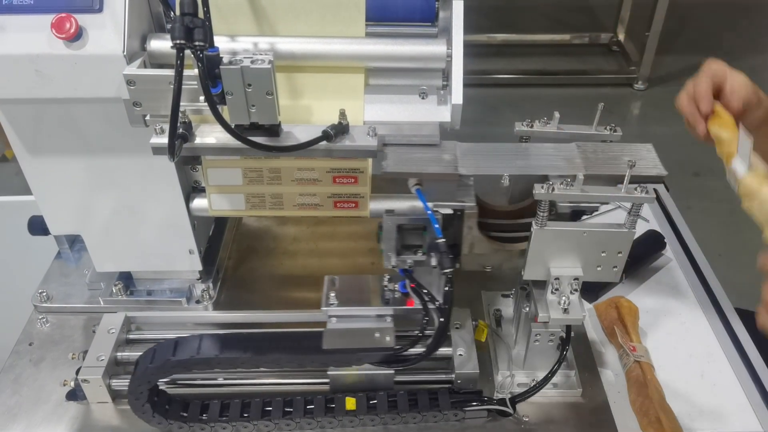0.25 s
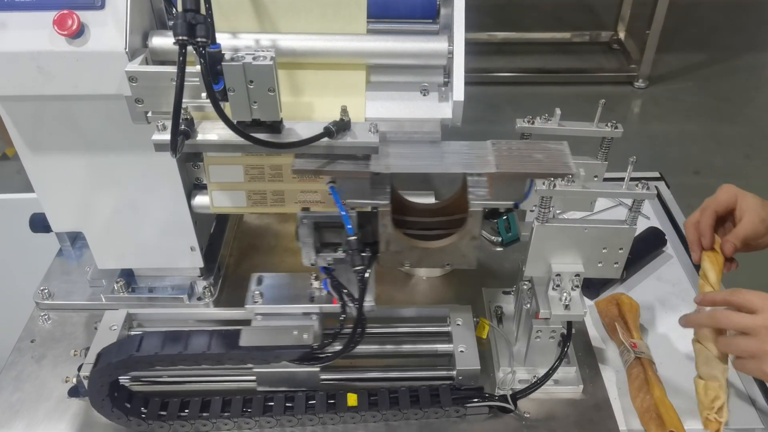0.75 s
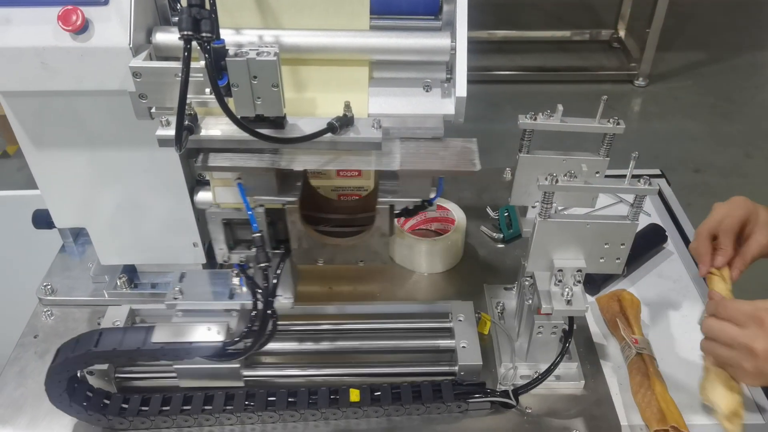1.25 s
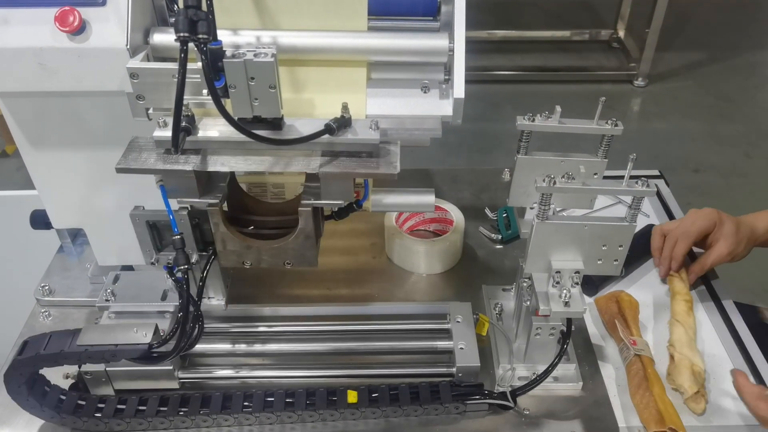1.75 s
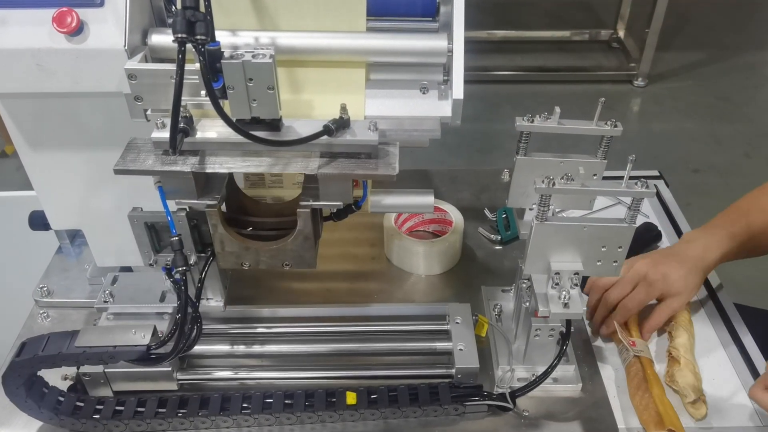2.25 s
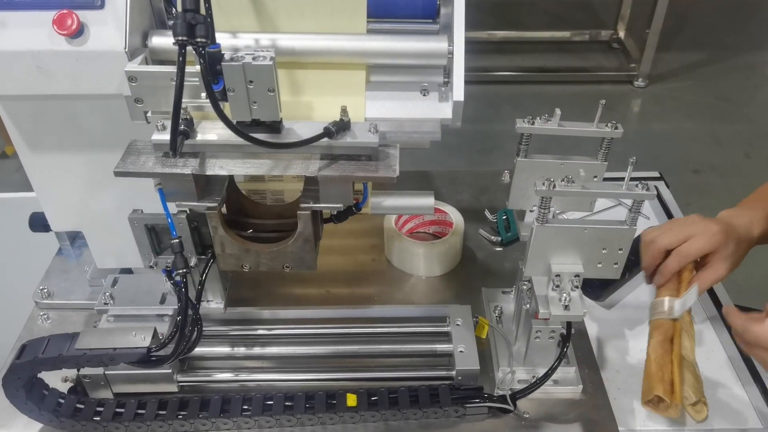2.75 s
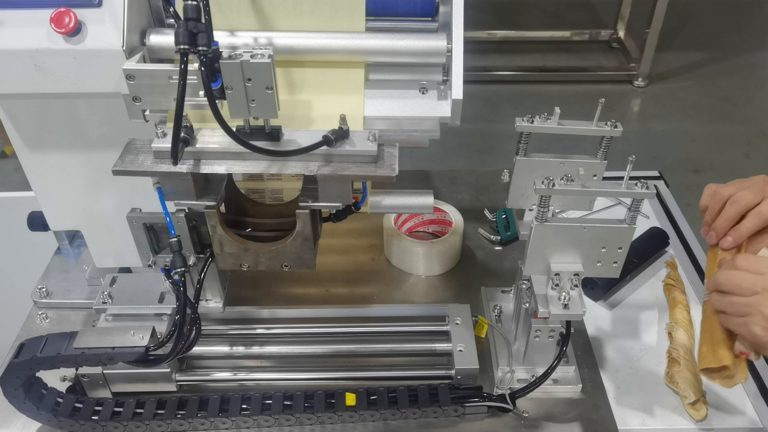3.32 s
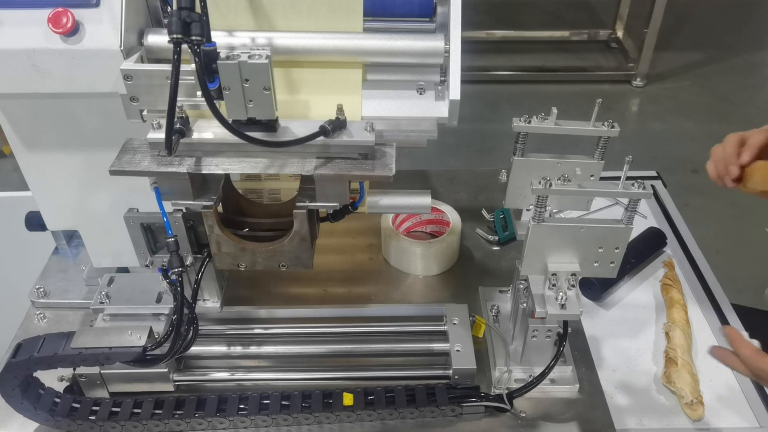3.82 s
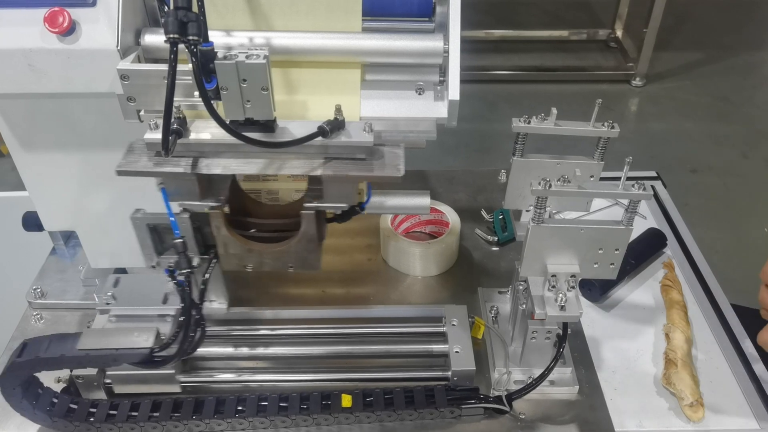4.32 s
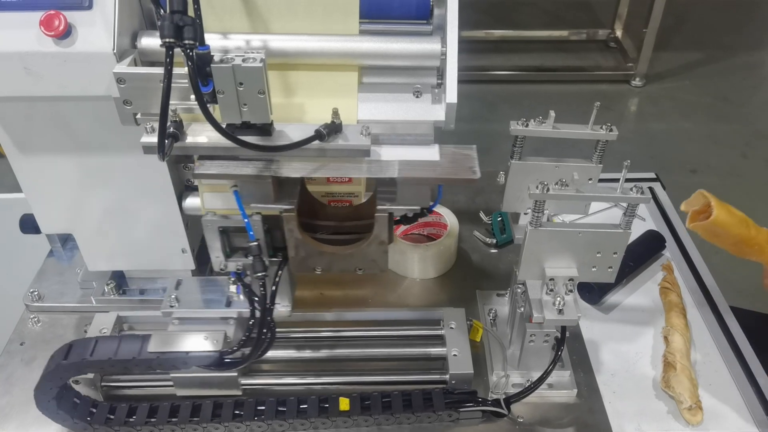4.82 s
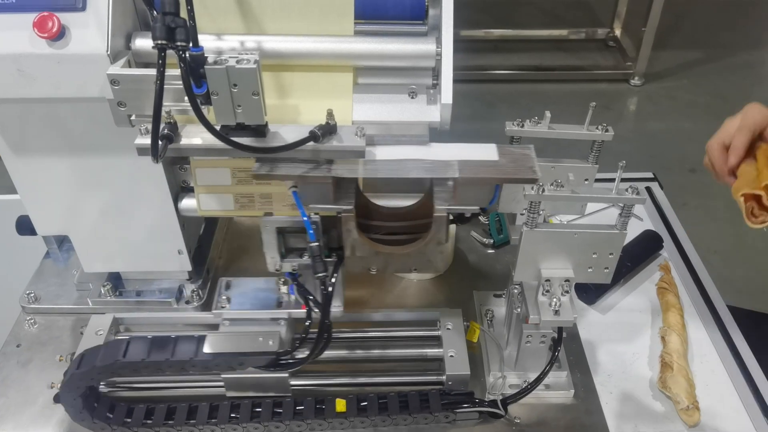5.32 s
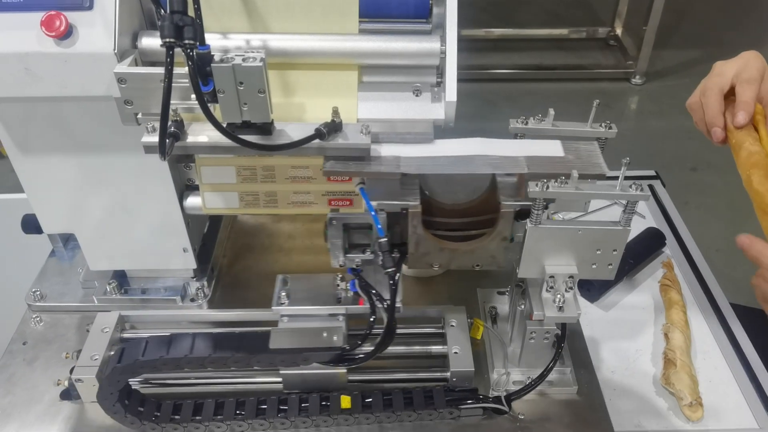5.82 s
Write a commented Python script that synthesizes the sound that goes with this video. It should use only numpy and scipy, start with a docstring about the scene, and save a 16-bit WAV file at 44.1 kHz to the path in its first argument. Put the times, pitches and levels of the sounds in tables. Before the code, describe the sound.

Close stereo pickup of a pneumatic machine in a reverberant workshop: low steady hum, wavering motor whine, fine cable-chain ticking. Small valve clicks come in clusters, then hiss and dull frame knocks. A sharp clack opens a fierce, fluttering air blast, which shuts with a knock and fading puff. The level drops suddenly, then slowly recovers beneath hiss, whine and isolated ticks.

```python
"""A machine worked by compressed air sticks labels in a hard-walled workshop, over a low hum and whine.
At first a slide squeals briefly as the carriage sets off; tones and noise bands make the drives' sound.
Valves tick in short spits of tiny impacts, air starts to leak as hiss, and knocks ring the metal frame.
Then a jet of shaped noise blasts for half a second, its cylinder vents, and the hall echoes it.
The blast turns the overall level down; it creeps back while the carriage travels once more."""
import sys
import numpy as np
from scipy import signal
from scipy.fft import rfft, irfft, next_fast_len
from scipy.io import wavfile
from scipy.ndimage import uniform_filter1d

SR = 44100
rng = np.random.default_rng(int(sys.argv[2]) if len(sys.argv) > 2 else 0)


def pcm_store(signal):
    """Save signal as 16-bit PCM."""
    levels = np.round(np.clip(np.atleast_2d(signal), -1, 1) * 32767)
    wavfile.write(sys.argv[1], SR, levels.astype(np.int16).T)


N = 267687
TIME = np.arange(N) / SR


def from_db(db):
    """Turn decibels into a gain."""
    return 10 ** (np.asarray(db) / 20)


def rms_one(x):
    """Scale a sound to an average power of 1."""
    return x / np.sqrt(np.mean(x ** 2) + 1e-20)


def at_hz(points, hz):
    """Read a table between its points, with pitch on a log axis."""
    table = np.array(points)
    return np.interp(np.log(np.maximum(hz, 1)), np.log(table[:, 0]), table[:, 1])


def coloured(x, colour):
    """Make each pitch of a sound louder or softer, following a table in dB."""
    size = next_fast_len(N + SR // 20, real=True)
    hz = np.fft.rfftfreq(size, 1 / SR)
    return irfft(rfft(x, size) * from_db(at_hz(colour, hz)), size)[..., :N]


def noise(colour):
    """Fresh noise with the given balance of pitches and an average power of 1."""
    return rms_one(coloured(rng.standard_normal(N), colour))


def noise_pair(colour):
    """Two separate noises, one for each microphone."""
    return np.array([noise(colour), noise(colour)])


def drift(rate_hz):
    """A slow random wander around 0, with an average power of 1."""
    step = 40   # compute every 40th sample, then join the points
    r = np.exp(-2 * np.pi * rate_hz * step / SR)
    slow = signal.lfilter([1], [1, -2 * r, r * r], rng.standard_normal(N // step + 2002))
    slow = slow[2000:]   # leave out the filter's start-up
    return np.interp(np.arange(N) / step, np.arange(len(slow)), rms_one(slow))


def burst(start_s, level_db, decay_s):
    """An envelope that jumps up and dies away."""
    out = np.zeros(N)
    first = max(int(start_s * SR), 0)
    age = TIME[:min(int(20 * decay_s * SR) + 1, N - first)]
    out[first:first + len(age)] = from_db(level_db) * np.exp(-age / decay_s)
    return out


def gate(start_s, end_s, rise_s, fall_s):
    """An envelope that builds up towards 1, holds, and dies away after its end."""
    rise = 1 - np.exp(-np.maximum(TIME - start_s, 0) / rise_s)
    return rise * np.exp(-np.maximum(TIME - end_s, 0) / fall_s)


def opening(start_s, rise_s, surge_db, settle_s):
    """Flow through an opened port: stored pressure makes it surge, then it settles to 1."""
    age = np.maximum(TIME - start_s, 0)
    return (1 - np.exp(-age / rise_s)) * from_db(surge_db * np.exp(-age / settle_s))


def resonance(x, hz, width):
    """Ring at one pitch: a narrow width in Hz rings longer, and the gain at the peak is 1."""
    r = np.exp(-np.pi * width / SR)
    feed = np.array([1, 0, -1]) * (1 - r * r) / 2
    return signal.lfilter(feed, [1, -2 * r * np.cos(2 * np.pi * hz / SR), r * r], x)


def high_pass(x, cut_hz):
    """Take away the sound below a pitch."""
    return signal.sosfilt(signal.butter(2, cut_hz, "high", fs=SR, output="sos"), x)


def pan(left_db):
    """Gains of the two microphones: the left one is this many dB above the right."""
    return from_db(np.array([[1], [-1]]) * left_db / 2)


def arrive(x, lead_ms):
    """Sound reaches the left microphone earlier than the right."""
    left, right = np.broadcast_to(x, (2, N))
    return np.array([left, np.roll(right, int(round(lead_ms * SR / 1000)))])


# how long the hall's echoes take to fall by 60 dB: pitch_hz, time_s
HALL_FADE = [(100, 1.34), (400, 1.22), (1500, 1.36), (5000, 1.26), (8500, 1.34), (11000, 0.39),
             (15000, 0.22)]


def hall_response(near_db=15.5, near_decay_s=0.0044, alike_hz=520):
    """Dense echoes: strong early ones off the machine's plates, then the hall's tail."""
    t = TIME[:3 * SR // 2]
    edges = np.geomspace(40, 18000, 15)
    out = 0
    for low, high in zip(edges, edges[1:]):
        hz = np.sqrt(low * high)
        band = signal.butter(2, [low, high], "band", fs=SR, output="sos")
        mid, side = signal.sosfilt(band, rng.standard_normal((2, len(t))))
        alike = 1 / (1 + (hz / alike_hz) ** 2)   # both microphones share the bass
        fade = np.exp(-np.log(1000) * t / at_hz(HALL_FADE, hz))
        out = out + fade * (np.sqrt(1 + alike) * mid + np.sqrt(1 - alike) * side * [[1], [-1]])
    early = 1 + from_db(near_db) * np.exp(-t / near_decay_s)
    out = out * early * (t > .002)   # no echo in the first 2 ms
    return out / np.sqrt(np.sum(out ** 2) / 2)


def in_hall(x, hall, wet_db):
    """Direct sound plus its echoes."""
    size = next_fast_len(N + hall.shape[1], real=True)
    echoes = irfft(rfft(x, size) * rfft(hall, size), size)[:, :N]
    return x + from_db(wet_db) * echoes


def stream(flow, colour, hall, lead_ms, wet_db):
    """An air stream is a long source: its two halves hiss separately and take different echo paths."""
    out = 0
    for paths in (hall, hall[::-1] * [[1], [-1]]):
        out = out + in_hall(arrive(flow * noise(colour), lead_ms), paths, wet_db)
    return out / np.sqrt(2)


# the carriage travels out and back: start_s, stop_s
TRAVELS = [(-.05, 2), (4.45, 6.2)]


def speed(speed_up_s=0.42, slow_down_s=0.22):
    """Speed of the carriage: it builds up towards full speed, 1, and dies away after each stop."""
    return sum(gate(start, stop, speed_up_s, slow_down_s) for start, stop in TRAVELS)


# balance of pitches in the hum: pitch_hz, relative level_db
HUM_COLOUR = [(25, -42), (50, -28), (80, -6), (120, 6.5), (175, -5), (260, -10.5), (340, -11), (450, -10.5),
              (560, -17), (1000, -17.5), (3000, -56)]


def motor_hum():
    """Low noise, mostly alike at both microphones, with a fainter part of opposite sign."""
    return from_db(-48) * noise(HUM_COLOUR) + from_db(-63.5) * noise(HUM_COLOUR) * [[1], [-1]]


# balance of pitches in the faint air noise: pitch_hz, relative level_db
AIR_COLOUR = [(200, -8), (900, -13), (1300, -4.5), (1700, -5.5), (2200, -1), (3500, -6.5), (4700, -1),
              (5800, -1), (7000, 4.5), (8600, 1.5), (10000, -10), (11500, -55), (16000, -46)]


def air_noise():
    """Steady faint noise of air, separate at each microphone."""
    return from_db(-41.0) * noise_pair(AIR_COLOUR) * pan(left_db=-3.5)


def drone(idle_db=-52, load_db=-52):
    """Noise rings near 250 Hz; the drive train drones harder under load."""
    load = gate(start_s=0.76, end_s=2.44, rise_s=0.27, fall_s=0.5)
    effort = from_db(idle_db) + from_db(load_db) * load
    ringing = resonance(rng.standard_normal(N), hz=243.7, width=27.5)
    return effort * rms_one(resonance(ringing, hz=256, width=270))


def tones(table, waver_hz=10.5):
    """Steady tones that waver in level and phase, above 500 Hz differently at each microphone."""
    out = np.zeros((2, N))
    for hz, level_db, waver in table:
        turning = np.exp(2j * np.pi * (hz * TIME + rng.random()))
        wander = np.array([1 + waver * (drift(waver_hz) + 1j * drift(waver_hz)) / np.sqrt(2)
                           for ear in range(2)])
        if hz < 500:
            heard = wander[0]   # long waves reach both microphones alike
        else:
            heard = wander * pan(left_db=-8.0) * np.array([[1], [1j]])   # a quarter turn apart
        out += from_db(level_db) * np.sqrt(2) * (heard * turning).real
    return out


# steady tones of the drives: pitch_hz, level_db, waver_share (0-1)
WHINE = [(1372.3, -47, 0.21), (1464, -49.5, 0.12), (1273, -58.5, 0.6), (1218, -63, 1), (117.7, -61, 0.51)]


def drive_whine():
    """The turning drives give steady, slightly wavering tones."""
    return tones(WHINE)


# tones of the carriage: pitch_hz, relative level_db, waver_share (0-1)
TRAVEL_TONES = [(1942, -53, 0.32), (2204, -55, 0.22), (2439, -63.5, 0.94), (2840, -59.5, 0.3),
                (4320, -61, 0.32), (7100, -53, .7)]


def carriage_singing(idle_db=-3.5, travel_db=-8):
    """The carriage's tones sound at rest and grow louder with its speed."""
    return (from_db(idle_db) + from_db(travel_db) * speed()) * tones(TRAVEL_TONES)


def slide_squeal(pitch_hz=4945, level_db=-33.5, decay_s=0.092):
    """A slide squeals out as the carriage sets off: ringing noise plus the dying hiss of an earlier sound."""
    ringing = resonance(rng.standard_normal((2, N)), pitch_hz, width=120)
    squeal = rms_one(resonance(ringing, pitch_hz, width=510))
    fading_hiss = from_db(-2.5) * noise_pair(TICK_COLOUR) * pan(left_db=-3.0)
    return burst(0, level_db, decay_s) * (squeal + fading_hiss)


# ports that open and go on leaking: start_s, relative level_db
LEAKS = [(1.402, -30.5), (1.575, -30)]
# balance of pitches in the leak's hiss: pitch_hz, relative level_db
LEAK_COLOUR = [(300, -52), (2100, -15.5), (3900, -17.5), (5500, -13.5), (7000, -2.5), (8400, 5),
               (9200, -0.5), (10000, -6.5), (11500, -20), (13200, -22.5), (16000, -32)]


def leak_hiss(hall):
    """Air seeps through small openings: each surges as it opens, then goes on hissing unevenly."""
    flow_power = 0
    for start, level_db in LEAKS:
        flow = from_db(level_db) * opening(start, rise_s=0.0045, surge_db=2, settle_s=0.7)
        flow_power = flow_power + flow ** 2
    flicker = from_db(drift(6.4) * 0.51)
    hiss = stream(np.sqrt(flow_power) * flicker, LEAK_COLOUR, hall, lead_ms=.02, wet_db=9.0)
    return from_db(-11.5) * hiss * pan(left_db=-3.0)


# balance of pitches in the rush: pitch_hz, relative level_db
RUSH_COLOUR = [(150, -24), (450, -0.5), (620, -9.5), (1100, -0.5), (1600, -1), (2100, 3.5), (3000, 4.5),
               (3900, -7.5), (5500, 4), (9000, -25)]


def line_rush(level_db=-40, travel_db=1):
    """A duller rush builds up in the lines behind the first leak, and swells as the carriage moves."""
    port = opening(LEAKS[0][0], rise_s=0.23, surge_db=8.5, settle_s=1.2)
    swell = from_db(level_db + travel_db * speed()) * port
    return swell * noise_pair(RUSH_COLOUR) * pan(left_db=-1.5)


# valve and latch ticks: start_s, relative level_db, decay_s, left_minus_right_db, relative ring_db
TICKS = [(.544, -30, .004, -3, 0), (.601, -27.5, 0.0048, -1, -10), (.876, -21.5, .002, 3, -8),
         (.893, -23, .002, -1, -12), (0.902, -22, 0.0026, -2, -10), (.908, -14, 0.003, 0, -14),
         (1.178, -25, .005, 6, -15), (1.182, -4.5, 0.00082, -5.5, -27), (1.2148, -11.5, 0.0017, 1, -14),
         (1.226, -19, .002, 0, -6), (1.238, -19, .0035, -5, -8), (1.408, -21.5, .0055, -5, -28),
         (1.61, -12, 0.0082, -4, -6.5), (2.091, -19.5, 0.0036, -5, -2), (2.441, -11, 0.002, -1, -2.5),
         (2.526, -12, 0.0022, -1, -13), (2.548, -6.5, 0.0013, -3, -6), (2.808, 11, 0.0021, 1, -0.5),
         (3.777, -14, 0.0067, -1, -1.5), (4.054, -11.5, 0.0024, -2, -1), (4.199, -18, .004, -1, -10),
         (4.211, -15.5, 0.0035, 1, 3.5), (4.976, -13, 0.004, 1, -6), (5.272, -12, .0035, -2, -24),
         (5.739, -18, 0.0053, -2, -4)]
# balance of pitches in a tick: pitch_hz, relative level_db
TICK_COLOUR = [(400, -30), (3500, -23), (4900, -23), (7000, -2), (8600, 0.5), (10000, -6.5), (11500, -24),
               (14000, -32), (16000, -44)]


def ticks(hall, rise_s=0.00018, links_per_s=9.0, ring_hz=5250):
    """Valves, latches, loose fittings and the moving cable chain spit tiny impacts; all but the chain ring."""
    # the faster the carriage, the more often a chain link ticks
    links = (rng.random(N) < links_per_s * speed() / SR) * rng.random(N)
    link_shape = burst(0, level_db=-30.5, decay_s=.004)[:SR // 20]
    chain = signal.oaconvolve(links, link_shape)[:N] * pan(left_db=5.5)
    # loose fittings clatter at each blow on the frame
    clatter = sum(burst(start, clatter_db, decay_s=0.031) for start, *_, clatter_db in BLOWS)
    clatter = clatter * pan(left_db=-2.5)
    spit = chain + clatter
    ring = from_db(-3.5) * clatter
    for start, level_db, decay, left_db, ring_db in TICKS:
        envelope = burst(start, level_db, decay) * pan(left_db)
        spit += envelope
        ring += envelope * from_db(ring_db)
    soft = np.exp(-1 / (rise_s * SR))   # contacts build up over a fraction of a millisecond
    envelopes = signal.lfilter([1 - soft], [1, -soft], np.array([spit, ring]) + 1e-18)
    # random signs turn the envelopes into dense tiny impacts
    spit, ring = envelopes * rng.choice([-1, 1], (2, 2, N))
    ring = resonance(resonance(ring, ring_hz, width=2200), ring_hz, width=5200)
    direct = from_db(8) * coloured(spit, TICK_COLOUR) + from_db(3) * ring
    return in_hall(direct, hall, wet_db=-1.5)


# cylinder and carriage blows on the frame, all levels relative:
# start_s, push_db, rattle_db, rattle_decay_s, contact_cutoff_hz, loose_fittings_clatter_db
BLOWS = [(1.570, 3, -20, 0.04, 2310, -17.5), (1.632, -7, -21, 0.065, 1410, -22),
         (1.676, -10, -29.5, 0.12, 1000, -22.5), (1.825, -13, -27, 0.024, 513, -21),
         (2.772, 6, -11.5, 0.0062, 700, -7.5), (2.819, -2, -15.5, .012, 400, -17.5),
         (3.277, 6, -19, 0.061, 500, -1), (3.402, -3, -8.5, 0.01, 199, -20)]
# pitches at which the frame rings: pitch_hz, width_hz, relative level_db
FRAME = [(127, 32, 2), (248, 24, 0), (322, 17.5, 3), (401.5, 46, 3.5), (430.3, 54, 3.5), (721, 57, -2.5),
         (836, 83, -6.5), (1060, 190, -6), (2400, 1500, -13.5), (4200, 1100, -23)]


def blows(hall, push_s=0.00045, rattle_low_hz=220):
    """A soft push and a dense rattle, dulled by the contact, set the frame ringing."""
    force = 0
    for start, push_db, rattle_db, decay, cut_hz, _ in BLOWS:
        rattle = burst(start, rattle_db, decay) * rng.choice([-1, 1], N)
        rattle = high_pass(rattle, rattle_low_hz)
        push = from_db(-18) * burst(start, push_db, push_s)
        contact = signal.butter(1, cut_hz, fs=SR, output="sos")
        force = force + signal.sosfilt(contact, rattle + push)
    frame = 0
    for k, (hz, width, level_db) in enumerate(FRAME):
        frame = frame + (-1) ** k * from_db(level_db) * resonance(force, hz, width)
    frame = high_pass(frame, 70)   # a small frame radiates no deep bass
    return in_hall(from_db(16) * frame * pan(left_db=-0.5), hall, wet_db=-4.0)


# balance of pitches in the venting air: pitch_hz, relative level_db
VENT_COLOUR = [(100, -34), (700, -37), (2200, -12), (4400, -6.5), (5600, 3.5), (6800, -4.5), (8400, 10),
               (11000, -17.5), (16000, -37)]
JET_OPEN_S, JET_SHUT_S = 2.772, 3.290   # the jet's valve opens and shuts


def cylinder_vent(hall):
    """The cylinder lets out its air in a fading puff of noise as the jet shuts."""
    puff = burst(JET_SHUT_S, level_db=-9.0, decay_s=0.1) * noise(VENT_COLOUR)
    return in_hall(arrive(puff, lead_ms=0.18), hall, wet_db=10.0) * pan(left_db=-3.0)


# balance of pitches in the jet: pitch_hz, relative level_db
JET_COLOUR = [(50, -33), (130, -21), (800, -28), (2200, -20), (4100, -16.5), (4650, -21), (5900, -8),
              (7100, -4), (7800, 4.5), (8900, 1.5), (9800, -2.5), (11600, -16), (13200, -9), (16000, -15.5)]
# the jet's beam reaches the microphones unevenly: pitch_hz, left_minus_right_db
JET_BEAM = [(1000, 5), (3000, 0.5), (5000, -1), (7400, -6.5), (8000, -9.5), (8900, 14.5), (9600, -2),
            (10500, 13.5), (11700, 4), (12300, -14), (16000, 4)]


def jet(hall, level_db=-2, fall_s=0.013):
    """Air rushing out in whirls makes a loud, fluttering noise until the valve shuts."""
    flow = opening(JET_OPEN_S, rise_s=0.008, surge_db=1.5, settle_s=0.032)
    flow = flow * np.exp(-np.maximum(TIME - JET_SHUT_S, 0) / fall_s)
    flutter = from_db(level_db + drift(72) * 1.14)
    blast = stream(flow * flutter, JET_COLOUR, hall, lead_ms=.2, wet_db=4.0)
    # each microphone gets half of the difference, with opposite sign
    left = coloured(blast[0], np.array(JET_BEAM) * [1, 0.5])
    right = coloured(blast[1], np.array(JET_BEAM) * [1, -0.5])
    return from_db(-5.0) * np.array([left, right])


def scene():
    """Add up all parts of the machine; those given the hall also echo in it."""
    hall = hall_response()
    drives = motor_hum() + air_noise() + drone() + drive_whine() + carriage_singing() + slide_squeal()
    leaks = leak_hiss(hall) + line_rush()
    return drives + leaks + ticks(hall) + blows(hall) + cylinder_vent(hall) + jet(hall)


def gain_control(x, threshold_db=-12.0, release_db_per_s=2.5, start_db=8.0, window_s=0.052):
    """Loud sound turns the gain down; it creeps back steadily, and starts out already lowered."""
    power = uniform_filter1d(np.mean(x ** 2, axis=0), max(int(window_s * SR), 1))
    over_db = np.maximum(10 * np.log10(np.maximum(power, 1e-12)) - threshold_db, 0)
    recovery_db = release_db_per_s * TIME
    # hold the largest cut so far, less what has crept back since
    cut_db = np.maximum.accumulate(np.maximum(over_db + recovery_db, start_db)) - recovery_db
    return x * from_db(-cut_db)


def record(dry):
    """Gain control, flattening of peaks beyond full scale, and a steep cut of the top treble."""
    limited = np.clip(gain_control(dry), -1, 1)
    top_cut = signal.ellip(12, .1, 80, 15850, fs=SR, output="sos")   # cut above 15850 Hz
    return signal.sosfilt(top_cut, limited)


dry = scene()
out = record(dry)
pcm_store(out)
```